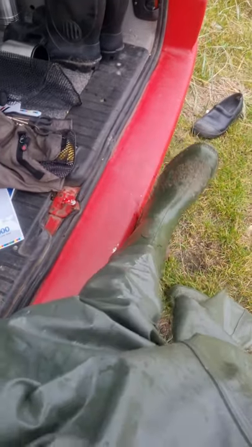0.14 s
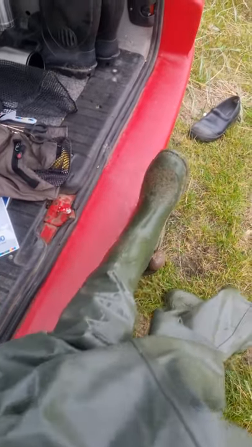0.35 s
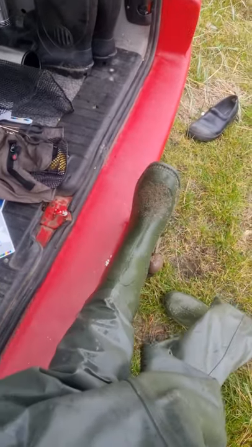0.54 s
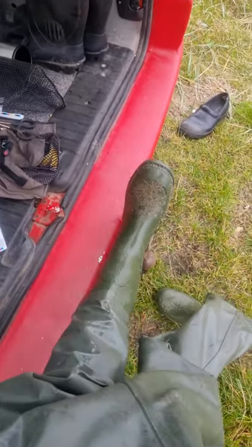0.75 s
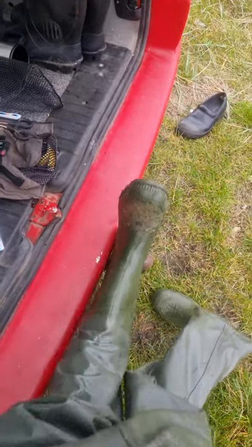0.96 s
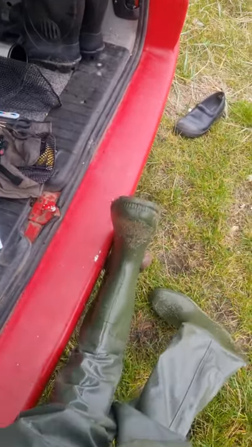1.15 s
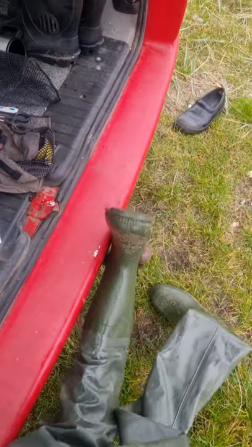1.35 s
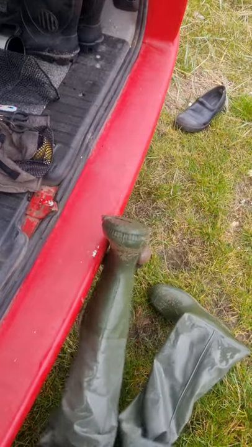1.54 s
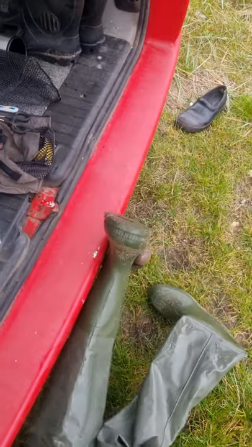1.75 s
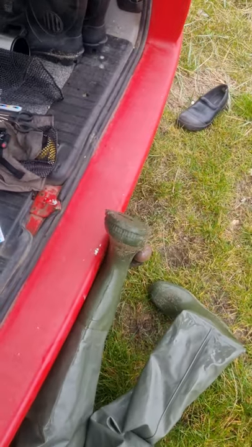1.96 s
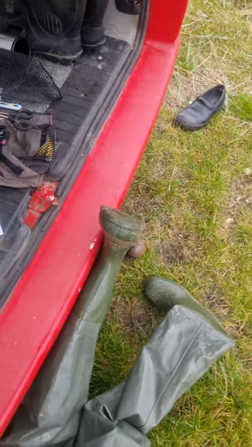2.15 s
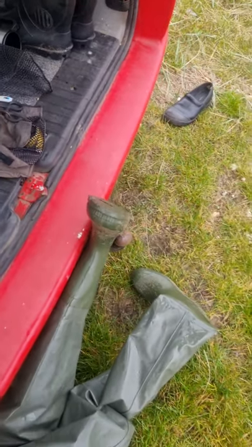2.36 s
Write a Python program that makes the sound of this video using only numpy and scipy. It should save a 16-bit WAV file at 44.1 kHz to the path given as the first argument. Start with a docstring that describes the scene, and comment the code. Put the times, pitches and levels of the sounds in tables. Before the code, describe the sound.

Rubber waders swish and rub as they are pulled up a leg, over low wind rumble.

```python
"""Outdoors, beside a vehicle sill: rubber waders are pulled up a leg, close to the microphone.
Two bright swishes, one long slide and a last dull scuff, each a crowd of tiny slips of rubber on cloth.
The loose rubber crumples, flutters, buckles with hollow plops and squeaks; the boot groans at the heel.
Wind and handling rumble underneath, over faint outdoor air."""
import sys
import numpy as np
from scipy import signal
from scipy.fft import rfft, irfft, next_fast_len
from scipy.io import wavfile
from scipy.ndimage import map_coordinates

SR = 44100
rng = np.random.default_rng(int(sys.argv[2]) if len(sys.argv) > 2 else 0)


def to_wav(sig):
    """Store sig (one row per channel, or 1-D mono) as 16-bit WAV at the path in sys.argv[1].

    Samples outside -1..1 are clipped; the rate is SR.
    """
    pcm = np.clip(np.atleast_2d(sig), -1, 1) * 32767
    pcm = np.round(pcm).astype(np.int16)
    wavfile.write(sys.argv[1], SR, pcm.T)  # frames by channels


N = 110250


def amp(db):
    """Decibels to gain."""
    return 10 ** (np.asarray(db) / 20)


def unit(x):
    """Scale to rms 1."""
    return x / np.sqrt(np.mean(x ** 2) + 1e-20)


def along(points, hz):
    """Read a curve on a log frequency axis."""
    freqs, values = np.transpose(points)
    return np.interp(np.log(hz + 1), np.log(freqs + 1), values)


def faders(rows):
    """One gain curve per dB column, fading fast outside the rows."""
    times, *levels = np.transpose(rows)
    t = np.arange(N) / SR
    outside = np.maximum(times[0] - t, 0) + np.maximum(t - times[-1], 0)
    return [amp(np.interp(t, times, db)) * np.exp(-outside / .02) for db in levels]


def wobble(rate):
    """A smooth random curve, rate knots a second."""
    knots = rng.standard_normal(int(N * rate / SR) + 4)
    return map_coordinates(knots, [np.arange(N) * rate / SR])


def filtered(x, response):
    """Shape x with a frequency response."""
    size = next_fast_len(N + SR // 2)
    return irfft(rfft(x, size) * response(np.fft.rfftfreq(size, 1 / SR)), size)[..., :N]


def spread(pair, correlation):
    """Two unrelated signals become left and right with a given correlation by frequency."""
    turn = lambda hz: np.arccos(np.clip(along(correlation, hz), -1, 1)) / 2
    mid, side = filtered(pair, lambda hz: np.array([np.cos(turn(hz)), np.sin(turn(hz))]))
    return np.array([mid + side, mid - side])


def pan(db):
    """Stereo gains, the left louder by db."""
    return amp(np.array([[.5], [-.5]]) * db)


def add(track, start, sound):
    """Mix a sound in at start seconds."""
    part = track[..., max(round(start * SR), 0):][..., :sound.shape[-1]]
    part += sound[..., :part.shape[-1]]


def slips(per_s, spread_db):
    """Two trains of tiny slips at random moments, with uneven sizes."""
    size = amp(spread_db * np.clip(rng.standard_normal(N), -2, 2))
    slipping = rng.random(N) < per_s / SR
    return size * slipping * rng.standard_normal((2, N))


def bursts(rows, t60_s=.073):
    """Envelope of sudden releases that die away."""
    out, t = np.zeros(N), np.arange(SR // 6) / SR
    for start, db in rows:
        add(out, start, amp(db - 60 * t / t60_s))
    return out


# stereo width of the rubbing (frequency [Hz], left-right correlation [clipped to -1..1])
RUB_WIDTH = [(300, 2.3), (520, -0.56), (790, 0.12), (1150, -0.57), (1700, -0.53), (2300, 0)]

def friction():
    """Rubber slides on cloth: dense slips with quick echoes."""
    return spread(sill_echoes(slips(per_s=9000, spread_db=3)), RUB_WIDTH)


# stereo lean of the rubbing, on top of each contact's pan (frequency [Hz], left minus right [dB])
RUB_BALANCE = [(540, 1.5), (900, -0.5), (1400, -3.5), (2000, -8), (2400, 2), (3300, 2.5), (4400, -2),
               (8200, 4), (13500, 0.5)]

def rub(grains, eq, pan_db):
    """Give the slips the tone and position of one contact, at rms 1."""
    return unit(filtered(grains, lambda hz: amp(along(eq, hz)) * pan(along(RUB_BALANCE, hz) + pan_db)))


# fader ride of the slide (time [s], relative rasp level [dB], relative hiss level [dB])
SLIDE_RIDE = [(.72, -107, -88), (.81, -81, -67.5), (.895, -59, -68), (.92, -55, -59.5), (1.04, -44, -51),
              (1.12, -43.5, -49.5), (1.19, -50, -56), (1.3, -45.5, -52), (1.43, -46.5, -45),
              (1.63, -45, -46.5), (1.82, -55, -53.5), (1.895, -64.5, -66.5), (1.965, -63, -76),
              (2.0, -86, -80)]
# throaty midrange of the slide (frequency [Hz], relative level [dB])
RASP_EQ = [(250, -19), (450, -14.5), (520, 1), (623, -11), (800, 1.5), (920, -10.5), (1050, -4.5),
           (1900, -5), (2900, -16), (5000, -37)]
# top end of the slide (frequency [Hz], relative level [dB])
HISS_EQ = [(1500, -47), (2900, -8), (4500, -6.5), (6800, -12), (8500, -16), (11600, -19.5), (13500, -14.5),
           (15500, -20)]

def slide(inner, outer):
    """One long pull: the inner slips rasp while the outer ones hiss."""
    rasp_gain, hiss_gain = faders(SLIDE_RIDE)
    rasp = amp(3.5) * rasp_gain * rub(inner, RASP_EQ, pan_db=1.4)
    hiss = amp(1.5) * hiss_gain * rub(outer, HISS_EQ, pan_db=1.5)
    return rasp + hiss


# two opening swells (time [s], relative level [dB])
SWISH_RIDE = [(0, -76), (.15, -58.5), (.195, -47.5), (.265, -42.5), (.343, -41), (.37, -50.5),
              (.435, -53.5), (.475, -38.5), (.55, -48.5), (.59, -62.5), (.615, -82)]
# bright flicks of a fold (time [s], level [dB])
FOLD_FLICKS = [(.57, -47.5), (.585, -53.5), (.743, -53.5), (.819, -55.5), (.836, -55.5), (1.414, -42),
               (1.955, -56)]
# wide, bright tone of swishes and flicks (frequency [Hz], relative level [dB])
SWISH_EQ = [(130, 9.5), (250, 4), (420, -8.5), (540, -1.5), (830, 1), (980, -8), (1350, 1.5), (2600, -8),
            (6700, -5.5), (8500, -11.5), (15500, -14)]

def swishes(grains):
    """Rubber sweeps over cloth twice; later, folds flick with the same tone."""
    gain = amp(2) * faders(SWISH_RIDE)[0] + bursts(FOLD_FLICKS)
    return gain * rub(grains, SWISH_EQ, pan_db=3.5)


# fader ride of the scuff (time [s], relative level [dB])
SCUFF_RIDE = [(2.085, -70), (2.13, -60), (2.2, -58.5), (2.24, -54.5), (2.32, -61.5), (2.5, -68.5)]
# dull tone of the scuff (frequency [Hz], relative level [dB])
SCUFF_EQ = [(250, -22), (520, 8), (620, -2), (1100, -1.5), (2000, -11), (5000, -22), (15000, -44)]

def scuff(grains):
    """A last soft rub of rubber on cloth."""
    return amp(5) * faders(SCUFF_RIDE)[0] * rub(grains, SCUFF_EQ, pan_db=-.8)


# crease hits (time [s], crunch level [dB])
CRUMPLE_HITS = [(.036, -51), (.333, -43), (1.043, -37), (1.594, -39), (1.658, -39), (1.779, -35),
                (2.217, -40.5)]
# boxy tone of the crunch (frequency [Hz], relative level [dB])
CRUMPLE_EQ = [(500, -6.5), (780, 4), (1100, -5), (1500, -6.5), (12000, -62)]

def crumples(grains, ring_hz=850, t60_s=.04, ring_offset_db=-2.5):
    """Each crease collapses in a crunch of slips and briefly rings the taut rubber."""
    crunch = bursts(CRUMPLE_HITS) * rub(grains, CRUMPLE_EQ, pan_db=1)
    rings, t = np.zeros(N), np.arange(SR // 12) / SR
    for start, db in CRUMPLE_HITS:
        hz = ring_hz * np.exp(.05 * rng.standard_normal())
        decay = amp(db + ring_offset_db - 60 * t / t60_s)
        add(rings, start, decay * np.sin(2 * np.pi * hz * t))
    return crunch + rings


# resonances of the hollow wader leg (frequency [Hz], bandwidth [Hz], relative level [dB])
LEG_MODES = [(259, 105.5, -3), (372, 40, 0), (529, 32.5, -8.5)]
# fader ride of the loose rubber (time [s], relative level [dB])
FLUTTER_RIDE = [(0, -61.5), (.15, -54.5), (.37, -40.5), (.43, -50.5), (.49, -41.5), (.585, -50.5),
                (.63, -67.5), (.73, -73), (.755, -47.5), (.85, -56.5), (.95, -44.5), (1.13, -45),
                (1.32, -48.5), (1.56, -37.5), (1.68, -48), (1.86, -52), (2.02, -71), (2.25, -58),
                (2.5, -70)]

def flutter(lowpass_hz=1100):
    """Small creases give way and ring the hollow leg."""
    def leg(hz):
        modes = sum((-1) ** k * amp(db) * 1j * hz * width / (centre ** 2 - hz ** 2 + 1j * hz * width)
                    for k, (centre, width, db) in enumerate(LEG_MODES))
        return modes / (1 + (hz / lowpass_hz) ** 4)

    creases = spread(slips(per_s=900, spread_db=1), correlation=[(370, .66), (520, 0)])
    body = unit(filtered(creases, leg))
    return amp(.5) * faders(FLUTTER_RIDE)[0] * body * pan(db=1)


# buckling folds (time [s], level before the low-pass [dB])
PLOP_HITS = [(.374, -30.5), (0.744, -31), (1.043, -33.5), (1.375, -26), (1.484, -24.5), (1.514, -26),
             (1.534, -20), (1.557, -32), (1.586, -23)]

def plops(pitch_hz=345, rise_s=.0038, t60_s=.02, lowpass_hz=297):
    """A fold snaps through with a short hollow note, muffled by the soft rubber."""
    notes, t = np.zeros(N), np.arange(SR // 8) / SR
    envelope = (1 - np.exp(-t / rise_s)) * amp(-60 * t / t60_s)
    envelope /= envelope.max()
    for start, db in PLOP_HITS:
        hz = pitch_hz * np.exp(.04 * rng.standard_normal())
        add(notes, start, amp(db) * envelope * np.sin(2 * np.pi * hz * t))
    return filtered(notes, lambda hz: 1 / np.sqrt(1 + (hz / lowpass_hz) ** 10)) * pan(db=3.5)


# chirps (time [s], length [s], start pitch [Hz], end pitch [Hz], dry level [dB], pitch jitter [ratio])
SQUEAK_CUES = [(0.307, 0.033, 3100, 2930, -47.5, .08), (1.784, 0.036, 2996, 3620, -48, .07),
               (2.1, 0.1, 1980, 1850, -59.5, .09)]

def squeaks():
    """Rubber grips and lets go in a rough, gliding note."""
    out = np.zeros(N)
    for start, length, start_hz, end_hz, db, jitter in SQUEAK_CUES:
        progress = np.linspace(0, 1, int(length * SR))
        glide = start_hz + (end_hz - start_hz) * progress
        hz = glide * (1 + jitter * wobble(start_hz / 2)[:len(progress)])
        arch = np.sqrt(np.abs(np.sin(np.pi * progress)))
        add(out, start, amp(db) * arch * np.sin(2 * np.pi * np.cumsum(hz) / SR))
    return sill_echoes(out) * pan(db=3)


def groan(start_s=1.904, length_s=.135, start_hz=139, end_hz=90, slips_per_s=58):
    """The heel sinks into the boot in uneven slips of falling pitch."""
    out = np.zeros((2, N))
    steps = np.linspace(0, 1, round(length_s * slips_per_s))
    offsets_s = rng.uniform(-.2, .2, len(steps)) / slips_per_s
    for progress, offset in zip(steps, offsets_s):
        hz = start_hz + (end_hz - start_hz) * progress
        add(out, start_s + progress * length_s + offset, thump(hz, db=-28.5))
    return out * pan(db=7.5)


def thump(hz, db, peak_cycles=.765):
    """A soft, low push, its phase skewed at random between left and right."""
    t = np.arange(SR // 6) / SR
    age = hz * t / peak_cycles
    swell = (age * np.exp(1 - age)) ** 2
    skew = 1.05 * rng.standard_normal() * np.array([[1], [-1]])
    return amp(db) * swell * np.sin(2 * np.pi * hz * t + skew)


def sill_echoes(x, t60_s=.04, path_change_s=.035):
    """Direct sound plus quick echoes off the bodywork, whose paths change as the leg moves."""
    t, out = np.arange(SR // 24) / SR, x * np.ones((2, 1))
    position = np.arange(N) / SR / path_change_s
    for path in range(int(position[-1]) + 2):
        near = np.flatnonzero(np.abs(position - path) < 1)
        crossfade = np.sqrt(1 - np.abs(position[near] - path))
        tail = rng.standard_normal((2, len(t))) * amp(-60 * t / t60_s)
        tail /= np.linalg.norm(tail[0])
        send = np.atleast_2d(x)[:, near] * crossfade
        add(out, near[0] / SR, signal.fftconvolve(send, tail, axes=1))
    return out


# swells of wind and handling (time [s], relative level [dB])
RUMBLE_RIDE = [(0, -68.5), (.2, -46), (.26, -64), (.37, -40), (.46, -45.5), (.56, -33.5), (.71, -54),
               (.79, -41), (.88, -55), (1.13, -47.5), (1.2, -38.5), (1.28, -48.5), (1.36, -35.5),
               (1.66, -37), (1.72, -47), (2.18, -44), (2.39, -62), (2.5, -59)]
# low-end weight of the rumble (frequency [Hz], relative level [dB])
RUMBLE_EQ = [(18, -16), (32, -13), (50, 5), (72, 1.5), (105, -8), (150, -22), (260, -38.5), (600, -75)]
# soft handling bumps (time [s], level [dB], pitch [Hz])
BUMP_HITS = [(0.35, -28, 68.7), (0.503, -28, 126), (0.524, -34, 114), (0.557, -32, 49),
             (1.662, -27.5, 65.3)]

def rumble():
    """Wind and handling buffet the microphone, with a few soft bumps."""
    noise = spread(rng.standard_normal((2, N)), correlation=[(60, .33)])
    lows = unit(filtered(noise, lambda hz: amp(along(RUMBLE_EQ, hz))))
    out = amp(3.5) * faders(RUMBLE_RIDE)[0] * lows
    for start, db, hz in BUMP_HITS:
        add(out, start, thump(hz, db))
    return out * pan(db=2.5)


# dark outdoor bed (frequency [Hz], relative level [dB])
AIR_EQ = [(30, 8), (400, -3.5), (900, -4), (2000, -9.5), (5000, -22), (15000, -35)]

def air(db=-67):
    """Faint, steady outdoor background."""
    noise = rng.standard_normal((2, N))
    return amp(db) * unit(filtered(noise, lambda hz: amp(along(AIR_EQ, hz))))


def scene():
    """The mix: rubbing up front, the rubber's accents, then the background."""
    inner, outer = friction(), friction()
    rubbing = slide(inner, outer) + swishes(inner) + scuff(inner)
    accents = crumples(outer) + flutter() + plops() + squeaks() + groan()
    return rubbing + accents + rumble() + air()


def record(dry):
    """A brick-wall low-pass trims the very top."""
    return filtered(dry, lambda hz: hz < 15800)


dry = scene()
out = record(dry)
to_wav(out)
```